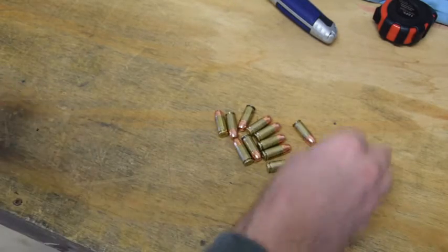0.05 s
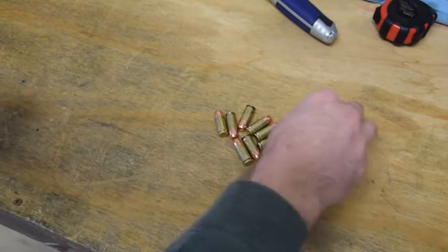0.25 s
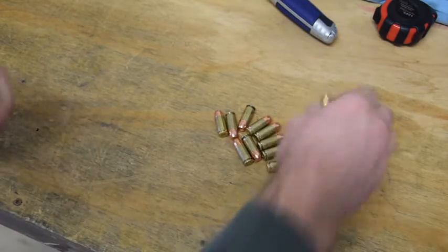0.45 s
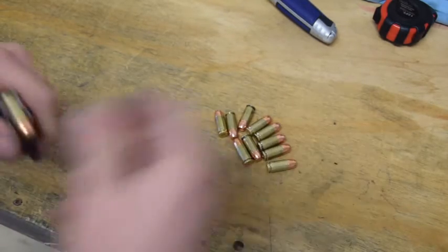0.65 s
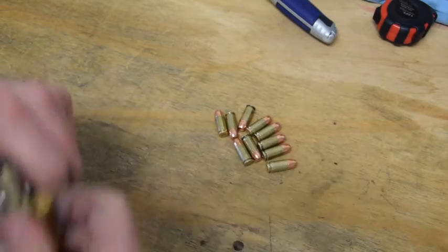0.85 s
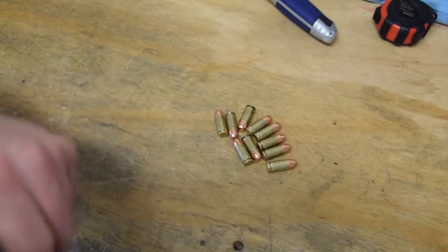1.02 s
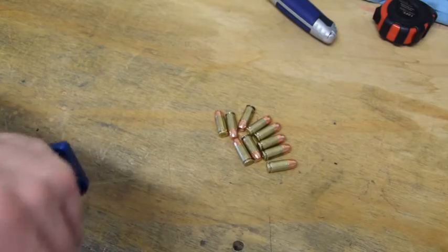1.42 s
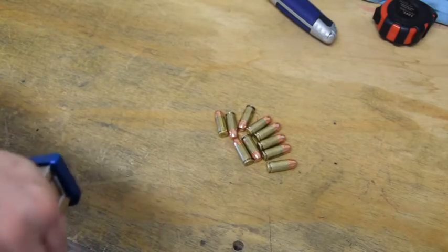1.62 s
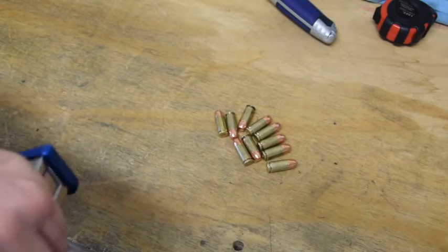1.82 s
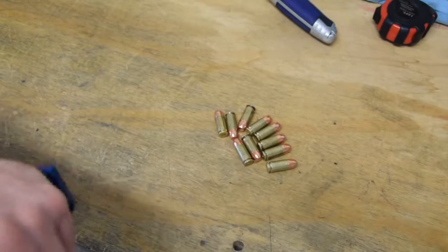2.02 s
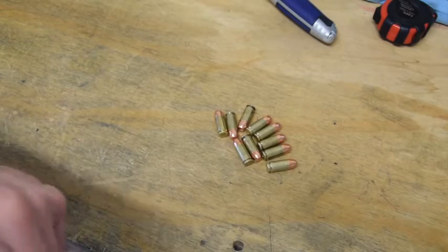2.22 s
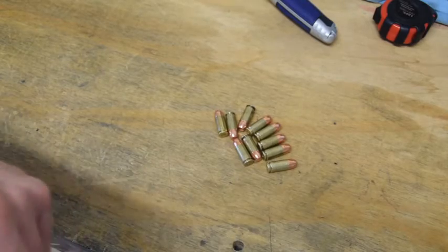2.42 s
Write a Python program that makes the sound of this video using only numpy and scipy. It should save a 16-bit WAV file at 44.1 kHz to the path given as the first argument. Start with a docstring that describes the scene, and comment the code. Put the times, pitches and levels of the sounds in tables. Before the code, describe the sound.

A sharp knock on a wooden workbench, then small metal clicks and a snap over fan hum.

```python
"""A fan hums throughout in a small workshop; the room answers each blow.
At 0.2 s a hard object is set down on a plywood bench, close enough to overload the microphone.
From 0.8 s a cartridge is thumbed into a magazine with a hand loader: small metal clicks.
At 1.65 s the loader snaps home; two light clicks follow."""
import sys
import numpy as np
from scipy import signal
from scipy.fft import rfft, irfft
from scipy.io import wavfile
from scipy.ndimage import uniform_filter1d

SR = 44100
rng = np.random.default_rng(int(sys.argv[2]) if len(sys.argv) > 2 else 0)


def int16_out(signal):
    """Quantize to a 16-bit WAV file."""
    q = np.round(np.clip(np.atleast_2d(signal).T, -1, 1) * 32767)
    wavfile.write(sys.argv[1], SR, q.astype(np.int16))


N = 112454


def undb(db):
    """Decibels to gain."""
    return 10 ** (np.asarray(db) / 20)


def bins_hz():
    """Frequencies of a full-length spectrum, floored at 1 Hz."""
    return np.maximum(np.arange(N // 2 + 1) * SR / N, 1)


def curve(points):
    """Interpolate (frequency [Hz], value) rows over log frequency."""
    hz, value = np.array(points).T
    return np.interp(np.log(bins_hz()), np.log(hz), value)


def bump(hz, half_width_hz):
    """Resonance peak of height one."""
    return 1 / (1 + ((bins_hz() - hz) / half_width_hz) ** 2)


def unit(x):
    """Scale to unit energy."""
    return x / np.sqrt(np.sum(x ** 2))


def colour(x, gain_db):
    """Minimum-phase filter, one gain per bin."""
    cepstrum = irfft(np.log(undb(gain_db)), N)
    cepstrum[1:N // 2] *= 2
    cepstrum[N // 2 + 1:] = 0
    return irfft(rfft(x) * np.exp(rfft(cepstrum)), N)


def whiten(x, width_hz):
    """Flatten the spectrum, keeping detail finer than the width; unit energy."""
    power = uniform_filter1d(np.abs(rfft(x)) ** 2, int(width_hz * N / SR) + 1)
    return unit(colour(x, -10 * np.log10(power + power.mean() / 100)))


def through(x, response):
    """Convolve with an impulse response."""
    return signal.fftconvolve(x, response)[:N]


def delay(x, delay_s):
    """Shift later, cut to N samples."""
    return np.concatenate([np.zeros(int(delay_s * SR)), x])[:N]


def decay(t60_s):
    """Exponential envelope."""
    return np.exp(-np.log(1000) * np.arange(N) / SR / t60_s)


def burst(t60_s):
    """Decaying noise with a flat spectrum."""
    return whiten(rng.standard_normal(N) * decay(t60_s), 2 / t60_s)


def ring(modes):
    """Damped modes, neighbours in opposite phase."""
    t = np.arange(N) / SR
    return sum((-1) ** k * undb(db) * decay(t60_s) * np.sin(2 * np.pi * hz * t)
               for k, (hz, db, t60_s) in enumerate(modes))


def stereo(mid, side):
    """Mid and side to left and right."""
    return np.array([mid + side, mid - side])


def fan():
    """Steady air noise in a resonant housing, diffuse in the treble, with mains hum and a thin whine."""
    # air noise (frequency [Hz], relative density [dB])
    air_spectrum = [(25, -31), (70, -28), (120, -17), (200, -16), (390, -2.5), (650, -9.5), (1100, -13),
                    (1600, -7.5), (2600, -17), (3500, -24), (5500, -25.5), (8000, -30.5), (12000, -36.5)]
    # housing resonances (frequency [Hz], half width [Hz], boost [dB])
    housing_peaks = [(850, 17, 5.5), (1460, 60, 4.5), (2160, 120, 2.5), (3002, 150, 11), (3945, 140, 16.5),
                     (4646, 150, 10)]
    # hum and whine (frequency [Hz], rms level [dB])
    hum_tones = [(120, -78), (2106, -65.5)]
    # stereo spread (frequency [Hz], side re mid [dB])
    side_spectrum = [(60, -20), (340, -25.5), (620, -15), (2000, -18), (3500, -7), (11000, -7.5)]
    air_rms_db = -51.5
    t = np.arange(N) / SR
    shape_db = curve(air_spectrum) + sum(db * bump(hz, half_hz) for hz, half_hz, db in housing_peaks)
    gain = undb(air_rms_db) * np.sqrt(N)
    mid, side = (gain * unit(colour(rng.standard_normal(N), shape_db)) for _ in range(2))
    tones = sum(np.sqrt(2) * undb(db) * np.sin(2 * np.pi * hz * t) for hz, db in hum_tones)
    return stereo(mid + tones, colour(side, curve(side_spectrum)))


def bench_knock(room):
    """The object lands edge first, then flat, and rings the bench top."""
    # object on bench (time [s], level [dB], contact time [ms])
    contacts = [(0.2114, -6.5, 0.086), (0.2138, 3, 0.069), (0.2255, -14.5, .2)]
    # bench top modes (frequency [Hz], level [dB], t60 [s])
    bench_modes = [(482.4, -17, 0.19), (553, -16.5, 0.15), (618.3, -17, 0.25), (688, -11.5, 0.15),
                   (841, -8, 0.12), (955, -15, 0.12), (1147, -10, 0.13), (1257, -11, 0.11),
                   (1370, -17, 0.15), (1533.4, -3, 0.13), (1678, -2.5, 0.14), (1780, -7, .12),
                   (2026, -3.5, 0.17), (2210, -12, 0.056), (2400, -9.5, 0.13), (2533, 7, 0.049),
                   (2610, -10.5, 0.25), (3016, -3, 0.074)]
    # dense overtones of the blow (frequency [Hz], relative level [dB])
    crack_spectrum = [(30, -17), (70, -16.5), (150, -21), (260, -20.5), (450, -1.5), (1000, -2), (2000, -1),
                      (3100, 3), (4000, -4.5), (6000, -16), (11000, -27.5)]
    modes_db, crack_db, room_db = -14.5, 18.5, -14.5
    t_ms = 1000 * np.arange(N) / SR
    direct = 0
    for time_s, db, contact_ms in contacts:
        force = np.exp(-t_ms / contact_ms)
        crack = unit(colour(burst(t60_s=0.026), curve(crack_spectrum)))
        body = undb(modes_db) * ring(bench_modes) + undb(crack_db) * crack
        direct += undb(db) * delay(through(body, 2 * force / force.sum()), time_s)
    return direct + undb(room_db) * through(direct, room)


def workshop_response():
    """Diffuse room tail; the mids ring longest."""
    # room decay (frequency [Hz], t60 [s])
    decay_times = [(100, 0.14), (500, 0.48), (1500, 0.49), (3000, 0.3), (6000, .23), (11000, 0.14)]
    build_s = 0.0017
    t = np.arange(N) / SR
    noise_spectrum = rfft(rng.standard_normal(N))
    t60_s = curve(decay_times)
    edges_hz = np.append(0, np.geomspace(200, SR / 2, 14))
    tail = 0
    for low_hz, high_hz in zip(edges_hz[:-1], edges_hz[1:]):
        band = (bins_hz() >= low_hz) & (bins_hz() < high_hz)
        tail += irfft(noise_spectrum * band, N) * decay(t60_s[band].mean())
    tail = whiten(tail * (1 - np.exp(-t / build_s)), width_hz=32.4)
    return unit(colour(tail, 10 * np.log10(t60_s)))  # energy proportional to t60


def metal_clicks(room, near):
    """Brass and steel parts catch, each with two short rings; nearby surfaces repeat them."""
    # clicks (time [s], level [dB], low edge [Hz], tilt at tilt_ref_hz [dB],
    #         first ring [Hz], second ring [Hz], ring boost [dB], ring half width [Hz])
    clicks = [(0.8127, -1.5, 1280, 1.5, 2080, 3500, 7, 189), (0.8197, -21, 1300, -1, 2030, 3000, 3, 190),
              (0.8565, -2.5, 1900, -1.5, 4050, 4850, 9, 150), (0.9717, -25, 3000, -21, 4480, 7500, 11, 400),
              (1.3008, -18.5, 1700, -6.5, 2480, 3950, 13, 250),
              (1.4507, -34, 2000, -11.5, 3010, 5000, 15, 295), (1.8638, -18, 1800, -6, 2700, 4800, 5, 244),
              (1.9248, -15.5, 4500, -8.5, 8250, 8700, 16.5, 452)]
    tilt_ref_hz, room_db = 5750, -2
    hz = bins_hz()
    direct = 0
    for time_s, db, low_hz, tilt_db, first_hz, second_hz, ring_db, half_hz in clicks:
        highpass_db = -10 * np.log10(1 + (low_hz / hz) ** 6)
        peaks_db = ring_db * np.maximum(bump(first_hz, half_hz), bump(second_hz, half_hz))
        shape_db = highpass_db + tilt_db * hz / tilt_ref_hz + peaks_db
        click = unit(colour(burst(t60_s=0.014), shape_db))
        direct += undb(db) * delay(click, time_s)
    return direct + through(direct, near) + undb(room_db) * through(direct, room)


def near_response():
    """Smeared echoes from nearby surfaces."""
    # reflections (delay [s], level [dB])
    echoes = [(.0033, 2), (.0078, -6), (.0128, -3.5)]
    return sum(undb(db) * delay(burst(t60_s=0.007), delay_s) for delay_s, db in echoes)


def loader_snap(room, near):
    """The loader snaps home in a quick run of hard contacts."""
    # loader contacts (time [s], level [dB])
    contacts = [(1.6467, -10.5), (1.6488, -2.5), (1.6500, -11), (1.6519, -10), (1.6598, -11.5)]
    # loader modes (frequency [Hz], level [dB], t60 [s])
    loader_modes = [(914, -8.5, 0.091), (1800, 2.5, 0.031), (2020, -10.5, .08), (2950, -15, .05),
                    (4630, -2, .06), (5550, -5.5, 0.11), (6640, -6, 0.097), (7700, -13, 0.069),
                    (8300, -11, .04), (8820, 8.5, 0.067), (9900, 7, 0.031), (11050, -0.5, 0.049)]
    # crack of each contact (frequency [Hz], relative level [dB])
    crack_spectrum = [(50, -40), (300, -33), (550, -29), (750, -8), (950, -2.5), (1400, -8), (2800, -1.5),
                      (4500, -6.5), (7000, -1.5), (10000, 2), (12000, -6)]
    crack_db, modes_db, near_db, room_db = 12, -26, -16, -12.5
    direct = 0
    for time_s, db in contacts:
        crack = unit(colour(burst(t60_s=0.008), curve(crack_spectrum)))
        body = undb(crack_db) * crack + undb(modes_db) * ring(loader_modes)
        direct += undb(db) * delay(body, time_s)
    return direct + undb(near_db) * through(direct, near) + undb(room_db) * through(direct, room)


def scene():
    """The blows reach two closely spaced microphone ports almost alike; the fan fills the room."""
    # port difference (frequency [Hz], side re mid [dB])
    side_spectrum = [(60, -26), (340, -43), (1000, -35), (2500, -25), (6000, -25), (11000, -12.5)]
    room, near = workshop_response(), near_response()
    blows = bench_knock(room) + metal_clicks(room, near) + loader_snap(room, near)
    side = colour(through(blows, burst(t60_s=0.015)), curve(side_spectrum))
    return stereo(blows, side) + fan()


def record(dry):
    """The input soft-clips the loudest peaks and cuts the top."""
    knee, cutoff_hz = 4.6, 11500
    clipped = dry / (1 + np.abs(dry) ** knee) ** (1 / knee)
    lowpass = signal.ellip(8, 0.2, 70, cutoff_hz, fs=SR, output="sos")
    return signal.sosfilt(lowpass, clipped)


dry = scene()
out = record(dry)
int16_out(out)
```